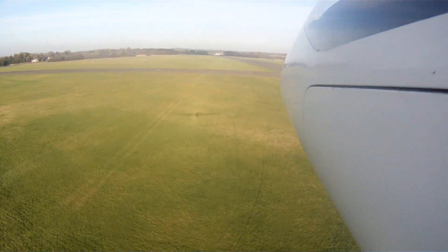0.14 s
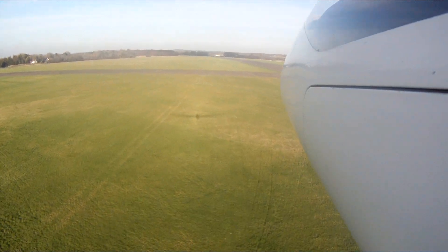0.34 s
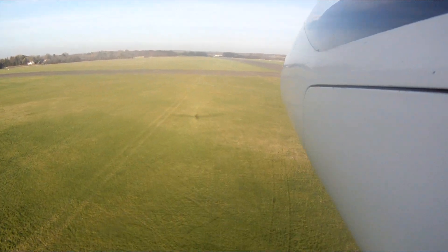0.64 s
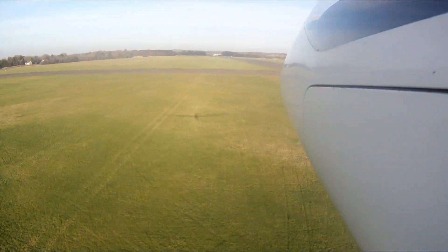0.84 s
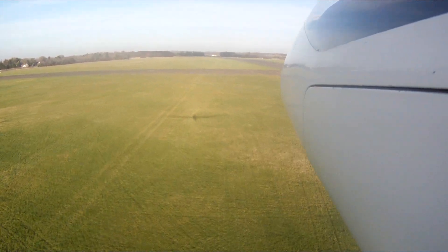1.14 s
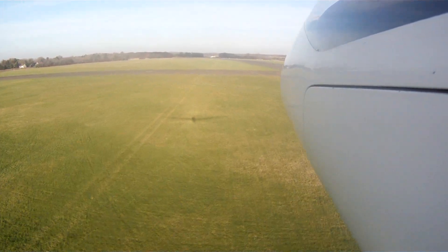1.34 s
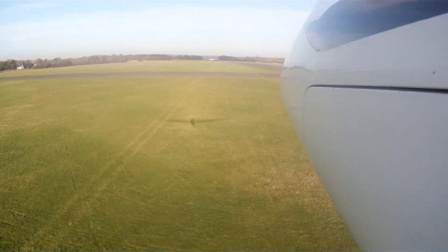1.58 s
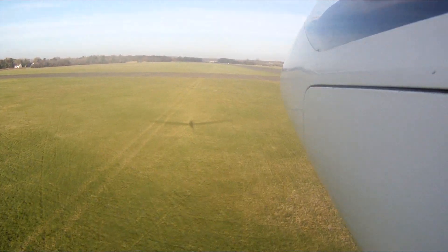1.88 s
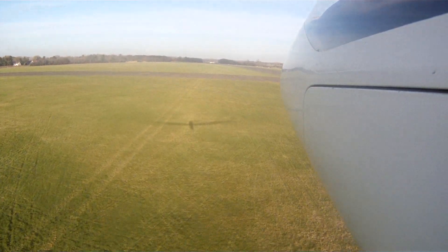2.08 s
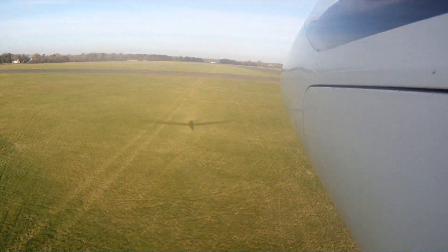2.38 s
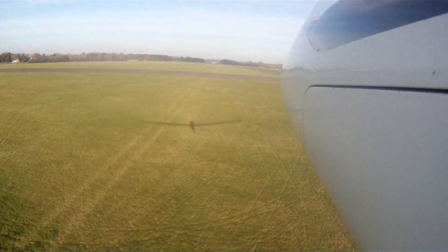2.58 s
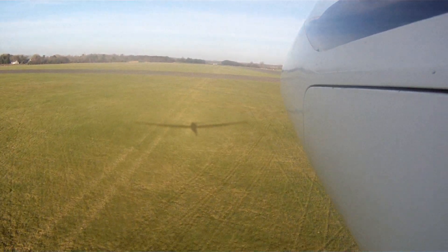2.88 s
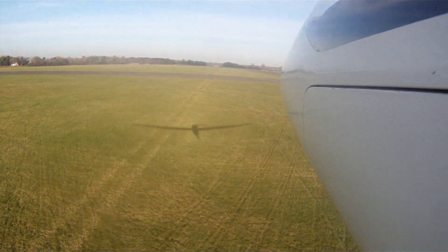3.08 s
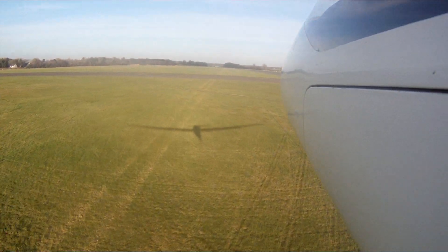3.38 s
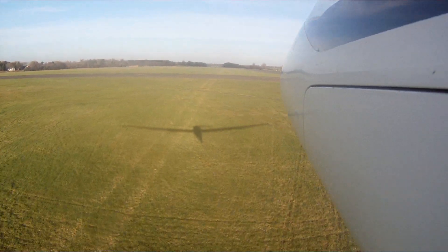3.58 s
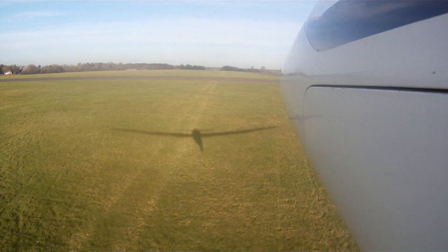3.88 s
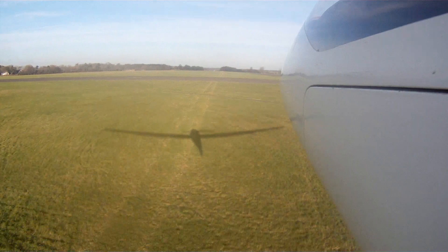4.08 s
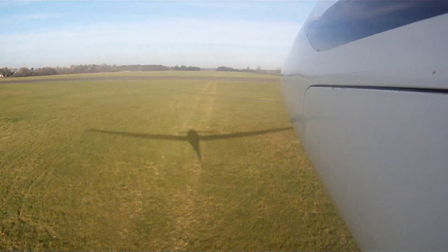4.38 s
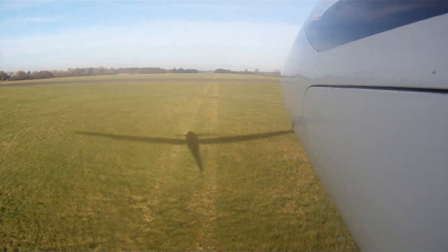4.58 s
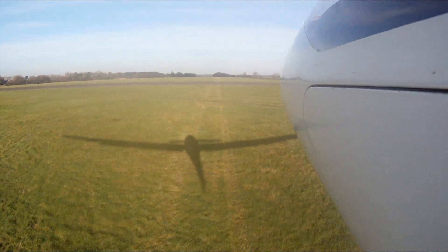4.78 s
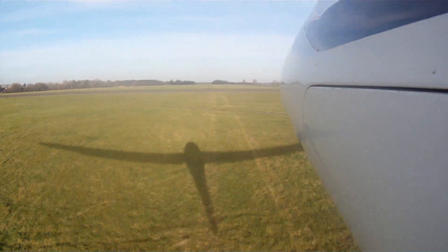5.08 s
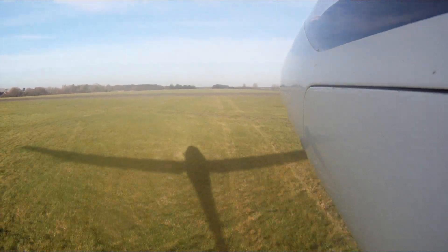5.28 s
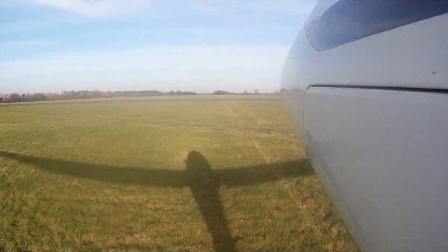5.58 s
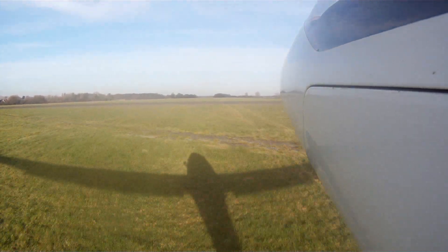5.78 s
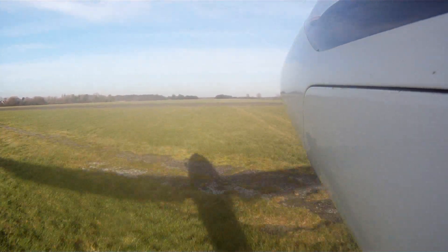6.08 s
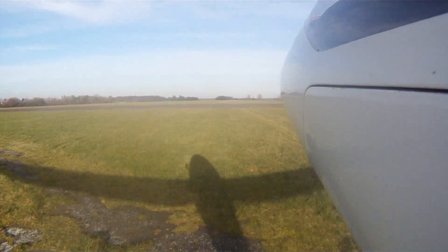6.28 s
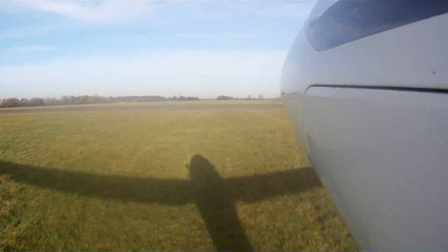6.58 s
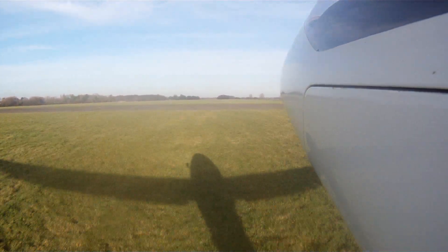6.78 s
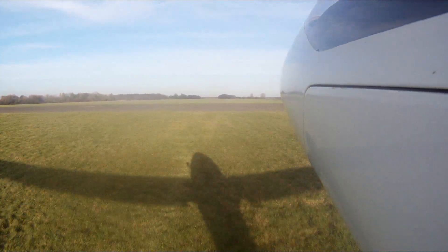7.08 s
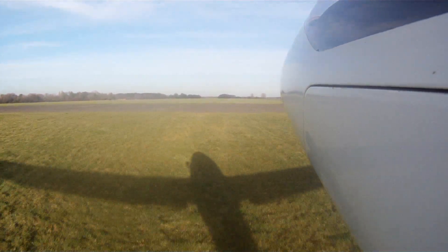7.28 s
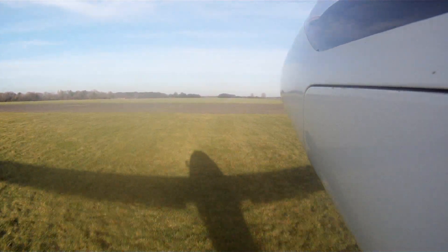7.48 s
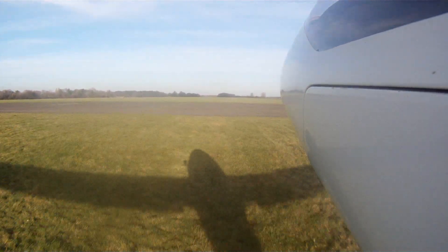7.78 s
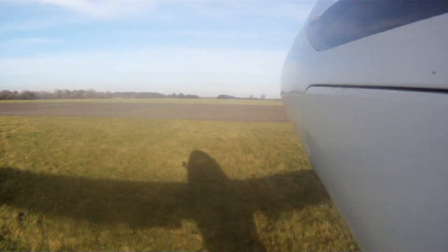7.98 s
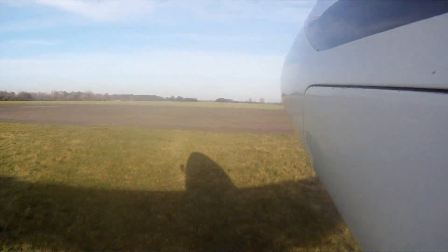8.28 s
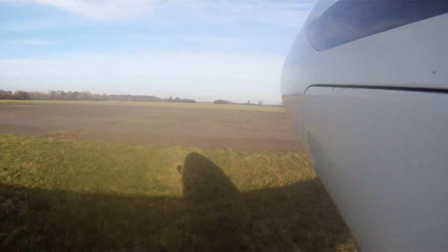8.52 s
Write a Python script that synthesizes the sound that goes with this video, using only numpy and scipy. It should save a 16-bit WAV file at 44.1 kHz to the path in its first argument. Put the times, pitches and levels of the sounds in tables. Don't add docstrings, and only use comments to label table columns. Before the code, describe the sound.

A dense, continuous roar of air batters a sealed camera housing on an engineless glider coming in low over grass. The sound is midrange-heavy, boxy and gritty, with a coarse treble hiss. Very low gust throbs and soft buffeting sit far beneath. It holds nearly steady, then eases in the second half as speed falls. No engine and no touchdown.

```python
import sys
import numpy as np
from scipy import signal
from scipy.fft import rfft, irfft, next_fast_len
from scipy.io import wavfile
from scipy.ndimage import uniform_filter1d

SR = 44100
rng = np.random.default_rng(int(sys.argv[2]) if len(sys.argv) > 2 else 0)


def unload_wav(signal):
    wavfile.write(
        sys.argv[1],
        SR,
        np.round(np.clip(np.atleast_2d(signal).T, -1, 1) * 32767).astype(np.int16),
    )


def makeup_ratio(level_db):
    decades = np.asarray(level_db, float) / 20
    return 10 ** decades


N = 381465

# t/s, level/dB
ROAR = [
    (0, -13.5),
    (1.4, -14.5),
    (2.1, -14.5),
    (4.1, -15),
    (4.6, -16),
    (5.8, -15.5),
    (6.4, -17.5),
    (7.0, -17.5),
    (7.3, -19),
    (8.65, -20),
]
# f/Hz, width/Hz, peak level/dB
WALL_MODES = [(708, 63, -13.5), (1006, 226, -8), (1237, 500, -14), (1681, 330, -7.5), (2050, 240, -8.5),
              (2493, 442, -2), (2766, 340, 1), (3164, 160, -14), (3544, 310, -16), (3795, 170, -20.5)]
# f/Hz, width/Hz, peak level/dB
CAVITY_MODES = [(4265, 560, -11), (4904, 395, 1), (5183, 750, -7)]
# f/Hz, density/dB per Hz
LEAK_SPECTRUM = [(400, -58), (620, -18), (1500, -18.5), (3000, -20), (4000, -23), (4600, -29), (5500, -54)]
# start t/s, length/s, level/dB, f/Hz
SWAYS = [(-.05, 0.6, -35, 27.2), (.64, 0.39, -33, 26.5), (1.04, 0.29, -28.5, 26.3),
         (1.32, 0.33, -32.5, 26.4), (1.94, 0.45, -42, 26.3), (2.44, .26, -36, 26.1),
         (2.78, 0.4, -30.5, 26.1), (3.19, .32, -34.5, 26.1), (3.59, 0.29, -36, 26.3),
         (3.86, 0.37, -43, 26.3), (4.5, .33, -37, 26.1), (4.84, .28, -41, 26.2), (5.12, 0.27, -37, 26.5),
         (5.5, 0.22, -38, 26.4), (5.78, 0.13, -36.5, 26.2), (5.96, 0.48, -39.5, 28), (6.46, .27, -44, 26.9),
         (6.7, 0.57, -37.5, 26.3), (7.39, .14, -40, 26.6), (7.6, .5, -39, 26.6), (8.1, 0.16, -41, 27.7),
         (8.35, 0.26, -40, 27.6)]
# f/Hz, density/dB per Hz
BUFFET_SPECTRUM = [(20, -28), (40, -1.5), (66, 1), (95, 0), (115, -4.5), (150, 0), (185, -6), (310, -4.5),
                   (415, -7), (520, -5.5), (680, -33)]
# centre t/s, half length/s, depth/dB
LID_LULLS = [
    (1.616, 0.12, -9),
    (7.2, .2, -4),
]
# low f/Hz, high f/Hz, share of time kept/0-1
FLICKERING_BANDS = [(5760, 5860, .85), (5860, 5950, .6), (5950, 6050, .22), (6050, 6140, .6),
                    (6140, 6240, .85), (11330, 11550, .86), (12440, 12650, .93)]

CRUISE_DB, CAVITY_DB = -14, -16
SWAY_EDGE_S, SWAY_SAG_DB_PER_S, SWAY_REST_DB = 0.1, -3, -55
BUFFET_DB, BUFFET_FOLLOWS = -37, 0.54
LID_DB, LID_FOLLOWS, LID_HZ, LID_WIDTH_HZ = -40, 0.56, 569, 38.4
GUARD_HZ, PREAMP_CEILING = 5520, 2.2
HELD_RATE_HZ, REPEATS = 12000, 4
DROPPED_LOW_HZ, DROPPED_HIGH_HZ, TOP_HZ = 11550, 12440, 15310


def curve(table):
    t_s, level_db = np.transpose(table)
    return np.interp(np.arange(N) / SR, t_s, level_db)


def unit(x):
    return x / np.sqrt(np.mean(x ** 2))


def walk(rate_hz):
    hold = int(SR / rate_hz)
    steps = np.repeat(rng.standard_normal(1000), hold)[:N]
    return unit(uniform_filter1d(uniform_filter1d(steps, hold), hold))


def ring(hz, width_hz):
    b, a = signal.iirpeak(hz, hz / width_hz, SR)
    once = signal.lfilter(b, a, rng.standard_normal(N))
    return signal.lfilter(b, a, once)


def coloured(spectrum):
    hz, db = np.transpose(spectrum)
    size = next_fast_len(N)
    f_hz = np.maximum(np.arange(size // 2 + 1) * SR / size, 1)
    gain_db = np.interp(np.log(f_hz), np.log(hz), db, left=-90, right=-90)
    return irfft(rfft(rng.standard_normal(size)) * makeup_ratio(gain_db), size)[:N]


def resonances(modes, flicker_db, rate_hz):
    total = np.zeros(N)
    for hz, width_hz, db in modes:
        total += makeup_ratio(db + flicker_db * walk(rate_hz)) * ring(hz, width_hz)
    return total


def housing(roar_db):
    walls = unit(resonances(WALL_MODES, flicker_db=0.17, rate_hz=12) + coloured(LEAK_SPECTRUM))
    cavity = unit(resonances(CAVITY_MODES, flicker_db=0, rate_hz=14))
    gusts_db = 0.37 * walk(16)
    return makeup_ratio(roar_db + gusts_db) * (makeup_ratio(0.37) * walls + makeup_ratio(CAVITY_DB + 3.0) * cavity)


def mount():
    t_s = np.arange(N) / SR
    size = makeup_ratio(SWAY_REST_DB)
    for start_s, length_s, db, _ in SWAYS:
        nearest_end_s = np.minimum(t_s - start_s, start_s + length_s - t_s)
        edge = np.clip(nearest_end_s / SWAY_EDGE_S + 0.38, 0, 1)
        sag_db = SWAY_SAG_DB_PER_S * (t_s - start_s - length_s / 2)
        size = size + makeup_ratio(db + sag_db) * np.sin(np.pi / 2 * edge) ** 2
    centres_s = [start_s + length_s / 2 for start_s, length_s, _, _ in SWAYS]
    hz = np.interp(t_s, centres_s, [sway[3] for sway in SWAYS])
    tone = np.sqrt(2) * np.sin(2 * np.pi * np.cumsum(hz) / SR)
    return makeup_ratio(1.5 * walk(9)) * size * tone


def buffet(ease_db):
    level_db = BUFFET_DB + BUFFET_FOLLOWS * ease_db + 1.0
    return makeup_ratio(level_db + 0.5 * walk(6)) * unit(coloured(BUFFET_SPECTRUM))


def lid(ease_db):
    t_s = np.arange(N) / SR
    lulls_db = sum(db * np.exp(-((t_s - centre_s) / half_s) ** 2) for centre_s, half_s, db in LID_LULLS)
    level_db = LID_DB + LID_FOLLOWS * ease_db + lulls_db + 4.0
    return makeup_ratio(level_db) * unit(ring(LID_HZ, LID_WIDTH_HZ))


def scene():
    roar_db = curve(ROAR)
    ease_db = roar_db - CRUISE_DB
    return (housing(roar_db) + mount() + buffet(ease_db) + lid(ease_db))[None]


def sample_and_hold(dry):
    x = signal.sosfilt(signal.butter(10, GUARD_HZ, fs=SR, output="sos"), dry)
    x = PREAMP_CEILING * np.tanh(x / PREAMP_CEILING)
    coarse = signal.resample_poly(x, HELD_RATE_HZ, SR, axis=1)
    held = np.repeat(coarse, REPEATS, axis=1)
    return signal.resample_poly(held, SR, HELD_RATE_HZ * REPEATS, axis=1)[:, :N]


def drop_faint_bands(x):
    size = next_fast_len(N)
    f_hz = np.arange(size // 2 + 1) * SR / size
    kept = (f_hz < TOP_HZ) & ((f_hz < DROPPED_LOW_HZ) | (f_hz > DROPPED_HIGH_HZ))
    spectrum = makeup_ratio(-0.01) * rfft(x, size) * kept
    out = irfft(spectrum, size)[:, :N]
    shared_mood = walk(30)
    for low_hz, high_hz, share in FLICKERING_BANDS:
        band = irfft(spectrum * ((f_hz >= low_hz) & (f_hz < high_hz)), size)[:, :N]
        mood = shared_mood + 0.6 * walk(30)
        on = uniform_filter1d(1.0 * (mood < np.quantile(mood, share)), size=500)
        out = out + (on / np.sqrt(share) - 1) * band
    return out


def roll_off(x):
    return signal.sosfilt(signal.butter(12, 15800, fs=SR, output="sos"), x)


def record(dry):
    mix = drop_faint_bands(sample_and_hold(dry))
    return roll_off(mix)


dry = scene()
out = record(dry)
unload_wav(out)
```